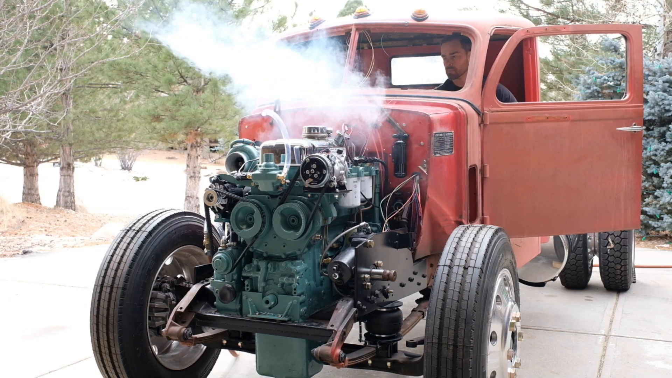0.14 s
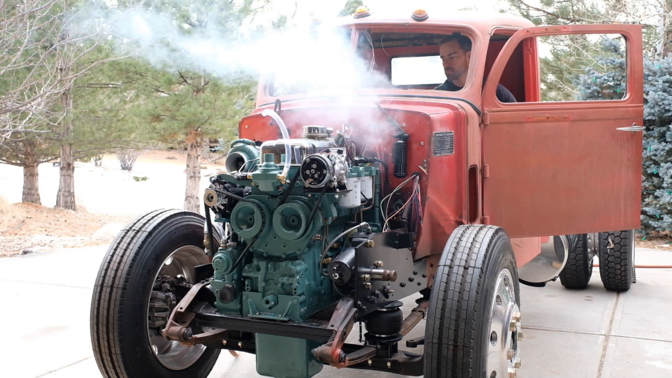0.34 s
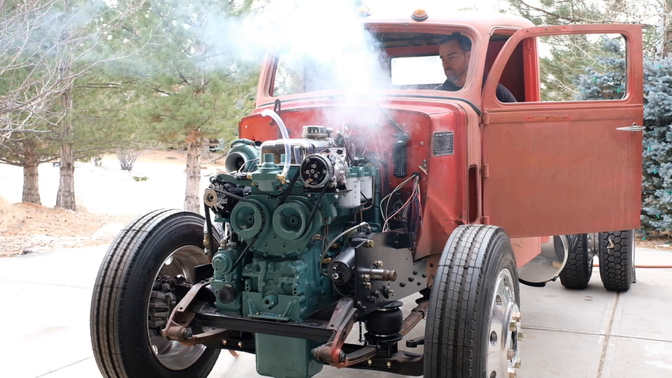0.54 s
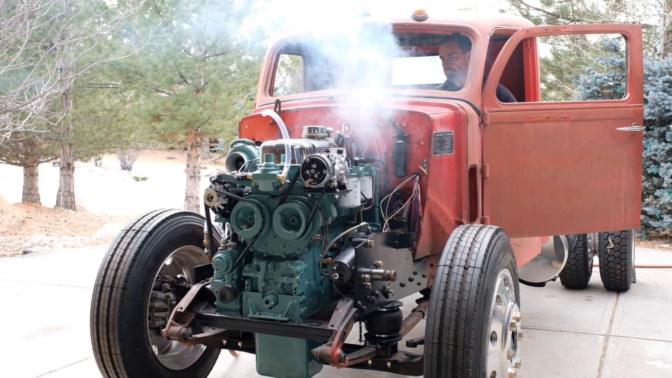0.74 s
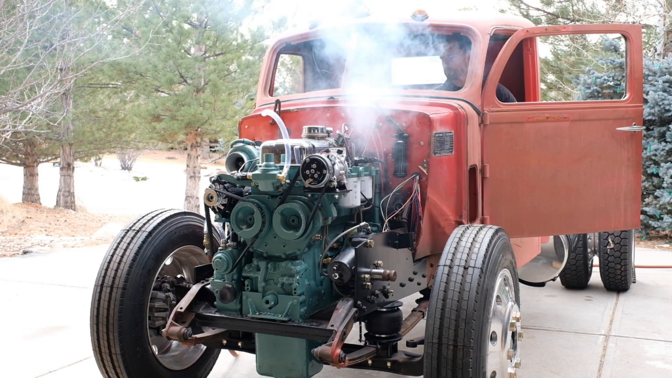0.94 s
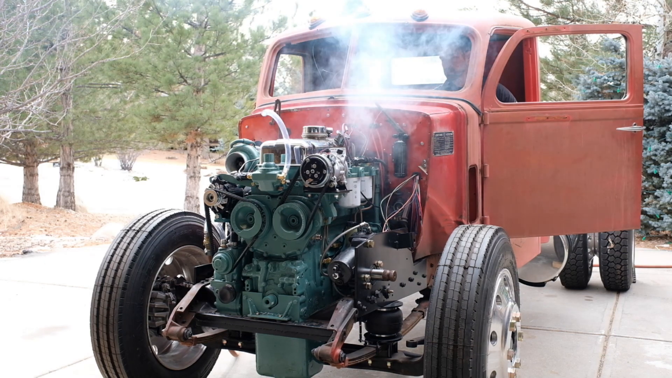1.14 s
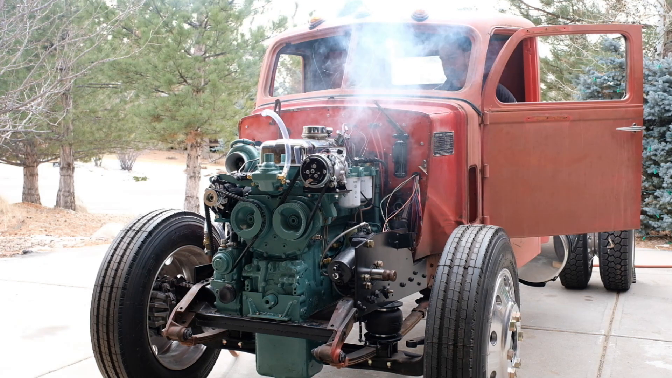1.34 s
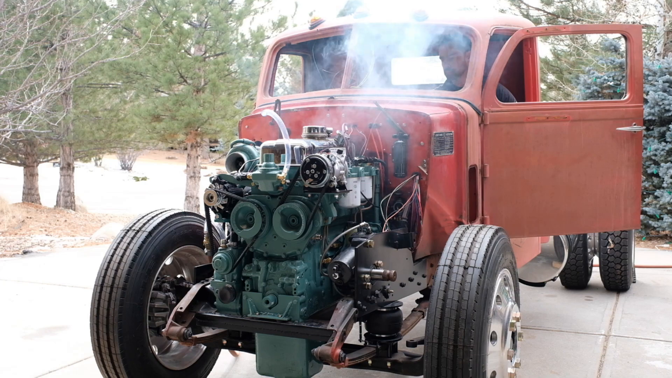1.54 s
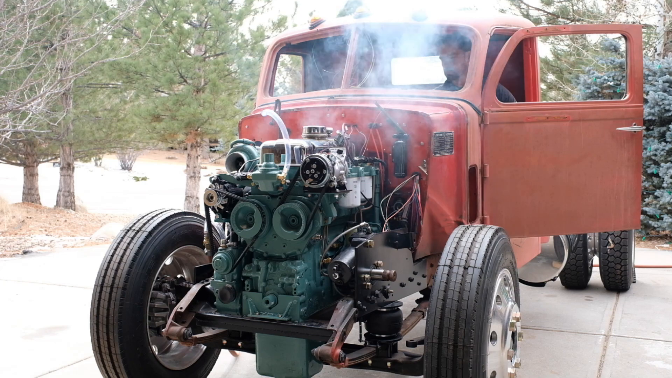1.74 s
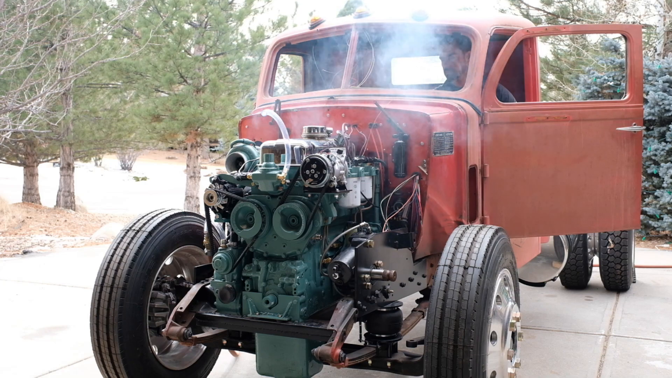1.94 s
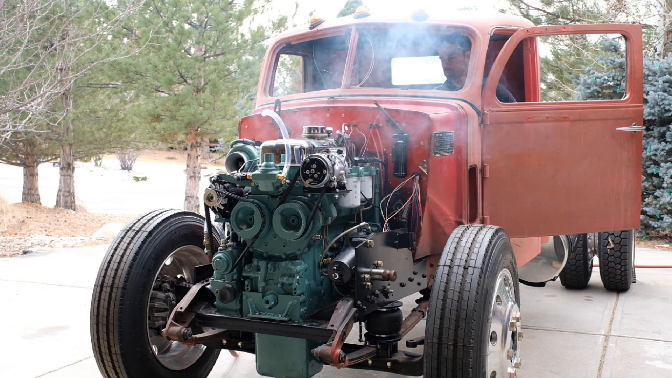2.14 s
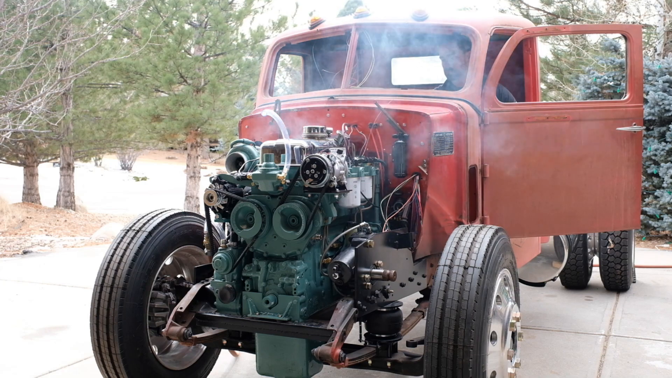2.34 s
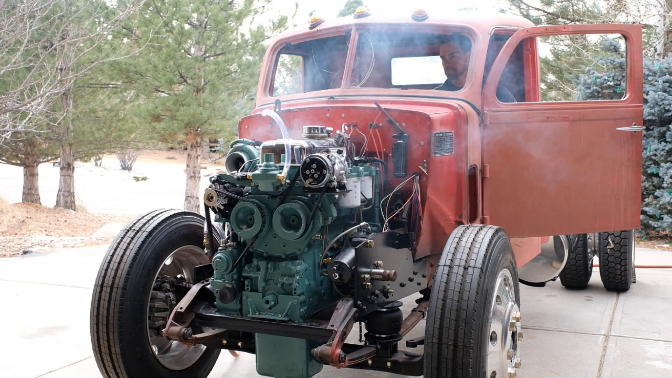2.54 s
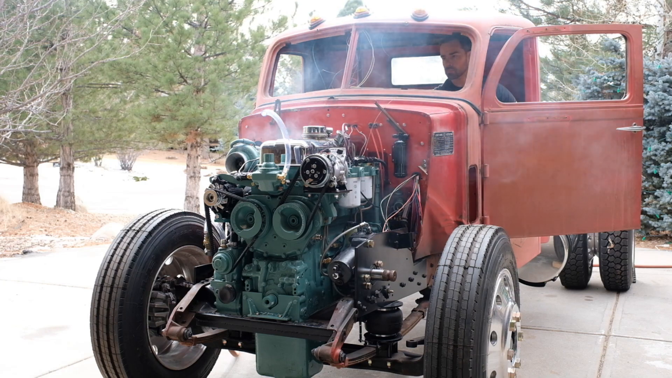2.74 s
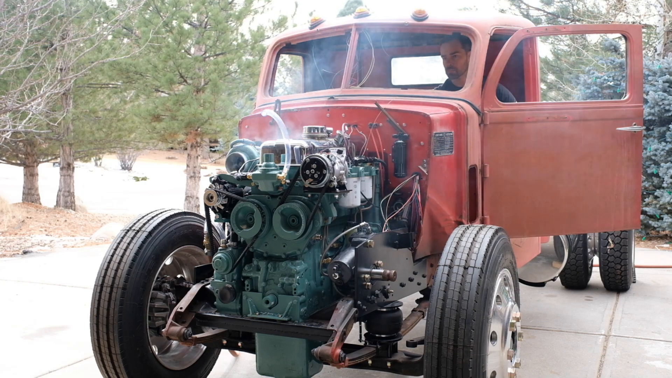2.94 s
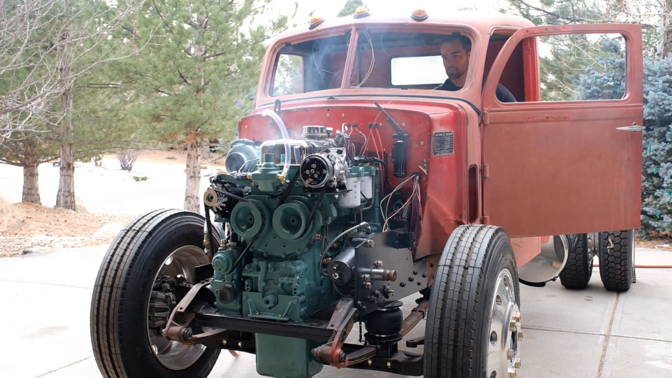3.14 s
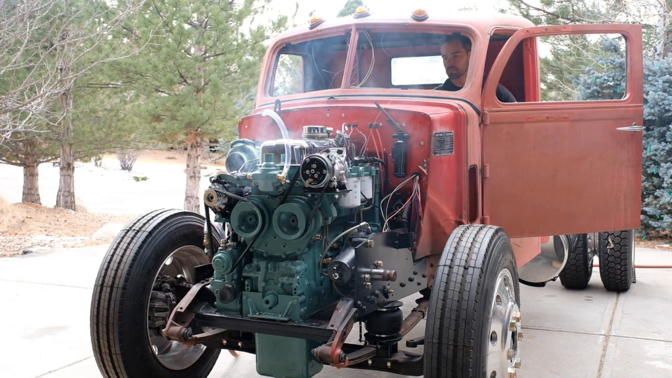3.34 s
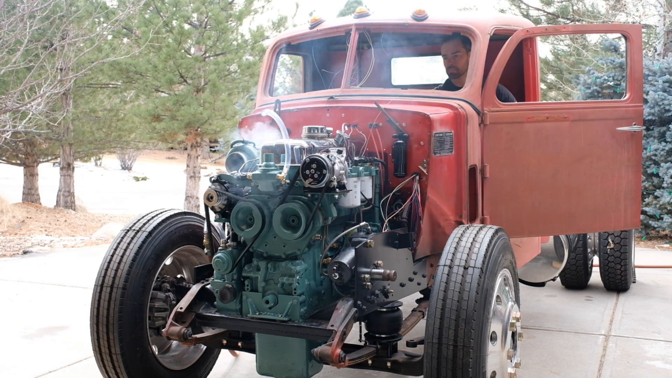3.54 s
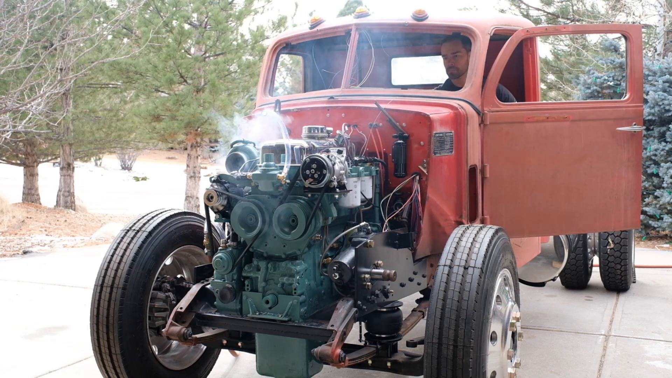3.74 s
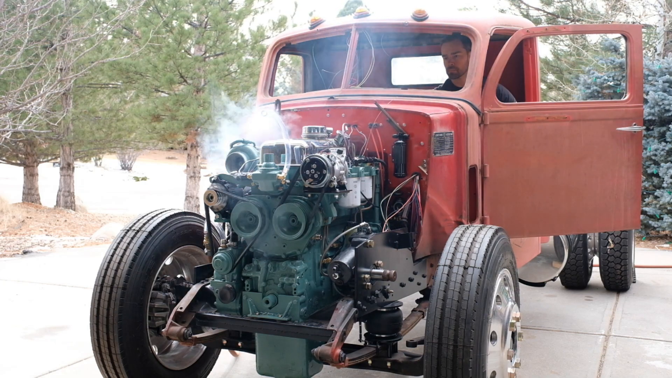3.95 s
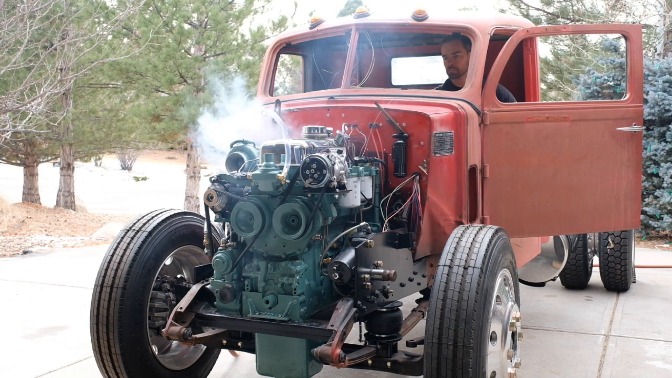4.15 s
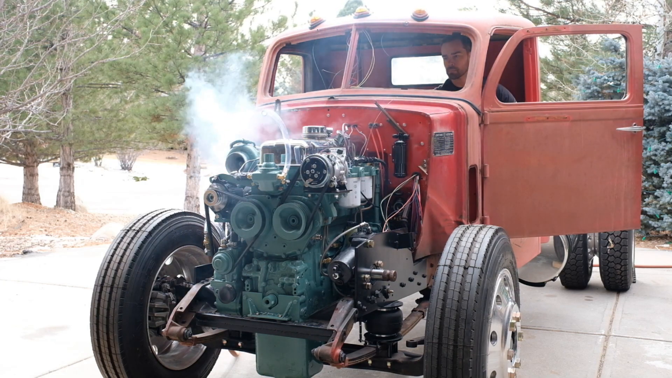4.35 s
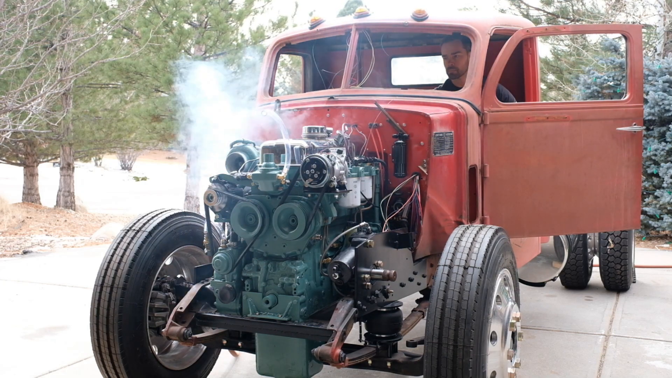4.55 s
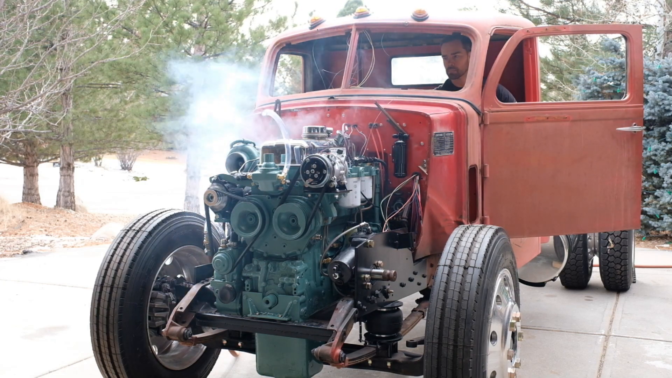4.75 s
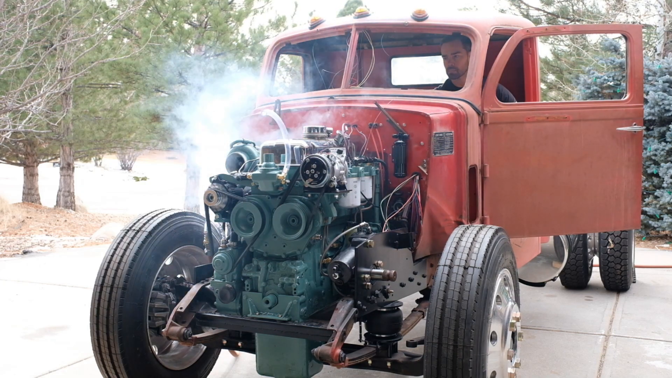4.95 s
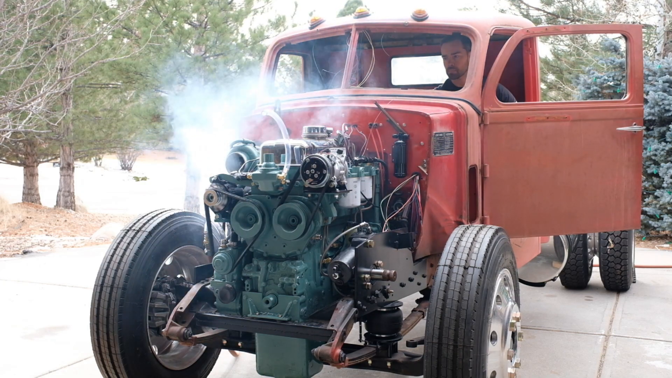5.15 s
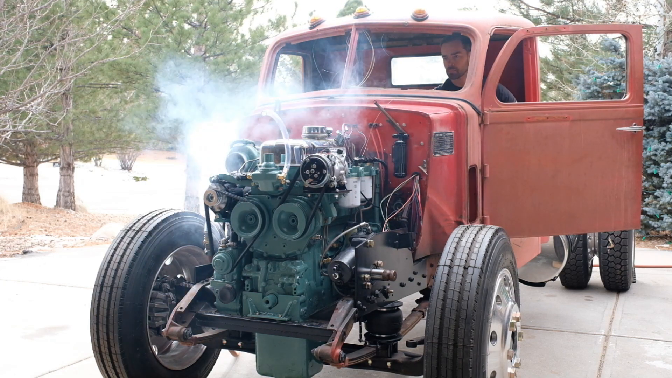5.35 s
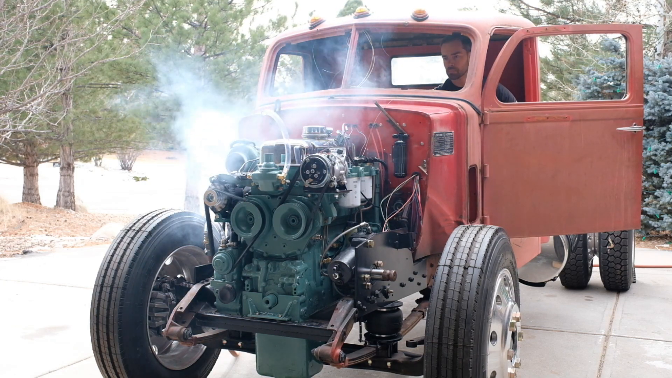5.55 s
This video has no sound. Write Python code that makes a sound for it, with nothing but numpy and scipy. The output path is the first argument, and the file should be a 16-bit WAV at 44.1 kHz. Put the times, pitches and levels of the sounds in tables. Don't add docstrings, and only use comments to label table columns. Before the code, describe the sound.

In an open yard, a big engine runs down to silence while uneven low wind gusts bump the left and right microphone ports. After a quiet pause comes a bright metallic slam, then a gritty geared whine climbing to cranking speed, pulsing with each compression. Knocks ring the iron casing, short high squeaks chirp, and a few exhaust thumps briefly raise the pitch. Steady laboured cranking carries on, close and loud, with short slap echoes.

```python
import sys
import numpy as np
from scipy import signal
from scipy.io import wavfile

SR = 44100
rng = np.random.default_rng(int(sys.argv[2]) if len(sys.argv) > 2 else 0)


def attenuation_scalar(level_db):
    decades = np.asarray(level_db, float) / 20
    return 10 ** decades


def log_audio(samples):
    frames = np.atleast_2d(samples).T
    limited = np.clip(frames, -1, 1)
    pcm = np.round(limited * 32767).astype(np.int16)
    wavfile.write(sys.argv[1], SR, pcm)


N = 246519
TIME = np.arange(N) / SR

# time_s, tooth_rate_hz, load_db
PINION = [
    (3.083, 175, -44),
    (3.17, 228.3, -28.5),
    (3.26, 296.5, -28),
    (3.35, 307.3, -24.5),
    (3.39, 347.3, -27.5),
    (3.56, 386.1, -23.5),
    (3.78, 408.3, -29.5),
    (4.6, 410.4, -30.5),
    (5.59, 408.7, -25.5),
]
CRANK_START_S = PINION[0][0]
# start_s, level_db, exhaust_pitch_hz, t60_s, kick_teeth_per_s
FIRINGS = [
    (3.857, -4.5, 132, 0.12, 104),
    (4.116, -7.5, 135, 0.12, 68),
    (4.347, -12.5, 152, 0.11, 0),
    (4.634, -11, 125.3, 0.21, 69.5),
]
# time_s, blow_db, ring_db
ENGAGING = [
    (3.087, -4.5, -5),
    (3.110, -0.5, -9),
    (3.177, -10, 8),
]
# time_s, blow_db, ring_db
COMPRESSIONS = [(3.248, -7, -7.5), (3.307, -15.5, -7.5), (3.376, -19.5, -13.5), (3.479, -13, -22.5),
                (3.577, -10.5, -2.5), (3.669, -9, -9), (3.751, -6.5, -23), (3.909, -1, -6),
                (3.967, -3, 1.5), (4.034, -17, 4), (4.161, -9, -6), (4.222, -10, 0), (4.282, -6.5, -4),
                (4.346, -8.5, -0.5), (4.413, -20, 5), (4.479, -25.5, 1), (4.544, -31, -3),
                (4.694, -3, -15.5), (4.753, -7.5, 0.5), (4.817, -10.5, -3), (4.884, -11.5, -2.5),
                (4.949, -13.5, 8.5), (5.012, -14.5, -1.5), (5.094, -9.5, 2), (5.166, -16, 2.5),
                (5.247, -9, 4), (5.321, -10.5, 3.5), (5.399, -17, 1.5), (5.479, -8, 6), (5.555, -9, -5)]
KNOCKS = np.vstack([ENGAGING, COMPRESSIONS])
# pitch_hz, width_hz
BELL_HZ = [(1390, 23.6), (2515, 17.2), (3000, 44)]


def rms_one(x):
    return x / np.sqrt(np.mean(x ** 2) + 1e-20)


def in_time(rows):
    s, *columns = np.transpose(rows)
    return [np.interp(TIME, s, c) for c in columns]


def at_hz(points, hz):
    points = np.array(points)
    return np.interp(np.log(hz), np.log(points[:, 0]), points[:, 1])


def band(x, low_hz, high_hz, order):
    return signal.sosfilt(signal.butter(order, [low_hz, high_hz], "band", fs=SR, output="sos"), x)


def low_pass(x, hz, order):
    return signal.sosfilt(signal.butter(order, hz, fs=SR, output="sos"), x)


def drift(rate_hz):
    r = np.exp(-40 * np.pi * rate_hz / SR)
    slow = signal.lfilter([1], [1, -2 * r, r * r], rng.standard_normal(N // 20 + 4002))[4000:]
    return np.interp(np.arange(N) / 20, np.arange(len(slow)), rms_one(slow))


def resonate(x, hz, width_hz):
    r = np.exp(-np.pi * width_hz / SR)
    poles = [1, -2 * r * np.cos(2 * np.pi * hz / SR), r * r]
    return signal.lfilter([(1 - r * r) / 2, 0, (r * r - 1) / 2], poles, x)


def coloured(spectrum, likeness, patchy_db, rate_hz):
    out, white = 0, rng.standard_normal((2, 2, N))
    lowest_hz, highest_hz = spectrum[0][0], spectrum[-1][0]
    edges_hz = np.geomspace(lowest_hz, highest_hz, int(2 * np.log2(highest_hz / lowest_hz)) + 2)
    for k, (low_hz, high_hz) in enumerate(zip(edges_hz, edges_hz[1:])):
        mid, side = band(white[k % 2], low_hz, high_hz, 2)
        hz = np.sqrt(low_hz * high_hz)
        alike = np.clip(at_hz(likeness, hz), 0, 1)
        gain = attenuation_scalar(at_hz(spectrum, hz) + patchy_db * drift(rate_hz))
        out = out + gain * (np.sqrt(1 + alike) * mid + np.sqrt(1 - alike) * side * [[1], [-1]])
    return rms_one(out)


def since_knock():
    at_s = KNOCKS[:, 0]
    share = np.interp(TIME, at_s, np.arange(len(at_s))) % 1
    last_s = at_s[np.clip(np.searchsorted(at_s, TIME) - 1, 0, None)]
    return np.abs(TIME - last_s), share


def run_ahead():
    rise_s, fade_s = .051, .46
    unload_db_per_hz, unload_s = .32, .034
    gained_hz, lost_db = np.zeros(N), np.zeros(N)
    for s, *_, kick_hz in FIRINGS:
        age_s = np.maximum(TIME - s, 0)
        gained_hz += kick_hz * np.minimum(age_s / rise_s, 1) * np.exp(-age_s / fade_s)
        lost_db += unload_db_per_hz * kick_hz * np.exp(-((TIME - s - rise_s / 4) / unload_s) ** 4)
    return gained_hz, lost_db


def housing(x, through_db):
    # pitch_hz, width_hz, level_db
    modes = [(610, 120, 3), (770, 90, -2), (990, 130, 3), (1250, 80, 0), (1390, 90, -1), (1820, 70, 0),
             (2100, 120, 0), (2340, 90, -2), (2515, 80, 1), (3000, 110, -5)]
    out = attenuation_scalar(through_db) * x
    for k, (hz, width_hz, db) in enumerate(modes):
        out = out - (-1) ** k * attenuation_scalar(db) * resonate(x, hz, width_hz)
    return out


def whine(sag, throb_db, wobble_db, rough_db):
    # order, level_db
    orders_db = [(1, -12), (2, -2.5), (3, -4.5), (4, -22), (5, -22), (6, -4), (9, -29)]
    pinion_teeth, bite_db_per_hz = 10, 0.0354
    hz, load_db = in_time(PINION)
    gained_hz, lost_db = run_ahead()
    hz = hz + gained_hz
    load_db = load_db - lost_db + bite_db_per_hz * gained_hz
    sixth_db = -2.5 - 0.2 * gained_hz
    share = since_knock()[1]
    turns = np.cumsum(hz * (1 + sag * (.5 - share) + .014 * drift(50))) / SR
    runout_db = wobble_db * np.sin(2 * np.pi * turns / pinion_teeth)
    beat_db = throb_db * (.5 - share) + runout_db
    tones = 0
    for k, db in orders_db:
        order_db = db + (k == 6) * sixth_db + k / 3 * beat_db
        tones = tones + attenuation_scalar(order_db + rough_db * drift(49)) * np.sin(2 * np.pi * k * turns)
    return attenuation_scalar(load_db + 6.0) * housing(tones, through_db=-10) * (TIME > CRANK_START_S)


def bell_db():
    # order, in_tune_db, max_loss_db
    tuning = [(3, -18.5, 9.5), (6, -17, 19.5), (6, -23.5, 32)]
    width = 0.13
    hz = in_time(PINION)[0] + run_ahead()[0]
    levels_db = []
    for (k, db, loss_db), (note_hz, _) in zip(tuning, BELL_HZ):
        mistuning = np.log(k * hz / note_hz) / width
        levels_db.append(db - loss_db * np.minimum(mistuning ** 2, 1))
    return levels_db


def knocks(burst_s):
    grit = rng.standard_normal((3, N))
    index = np.clip(np.searchsorted(KNOCKS[:, 0], TIME) - 1, 0, None)
    age_s, tuned_db = since_knock()[0], bell_db()
    shape = (1 - np.exp(-age_s / .0008)) * np.exp(-age_s / burst_s) * (TIME > KNOCKS[0, 0])
    blow = attenuation_scalar(KNOCKS[index, 1]) * shape * np.exp(-age_s / burst_s)
    dull = band(grit[0] * blow, 500, 2000, 3)
    bell = 0
    for k, (hz, width_hz) in enumerate(BELL_HZ):
        strike = attenuation_scalar(KNOCKS[index, 2] + tuned_db[k]) * shape * grit[k]
        bell = bell + resonate(strike, hz, width_hz)
    crack_db = np.where(index == 0, -5, -22.5)
    bright = (grit[1] + 0.64 * grit[2] * [[1], [-1]]) * blow * attenuation_scalar(crack_db)
    return attenuation_scalar(4) * dull + attenuation_scalar(26) * bell, band(bright, 2500, 9000, 2)


def squeaks(low_hz, rise_hz, length_s):
    # peak_time_s, level_db
    lone = [(3.49, -32), (3.6, -27), (3.832, -24.5), (4.05, -30), (4.3, -32), (4.56, -35), (4.6, -31),
            (5.04, -27)]
    # from_s, to_s, lead_s, level_db
    squeak_runs = [
        (4.4, 4.56, .036, -33.5),
        (4.87, 5.03, 0.03, -30.5),
        (5.08, 5.59, .013, -26.5),
    ]
    out = np.zeros(N)
    t = np.arange(-.06, .06, 1 / SR)
    note = np.exp(-(t / length_s) ** 2) * np.sin(2 * np.pi * (low_hz * t + rise_hz * t ** 2 / (4 * length_s)))
    events = list(lone)
    for from_s, to_s, lead_s, db in squeak_runs:
        events += [(s - lead_s, db) for s in KNOCKS[:, 0] if from_s < s < to_s]
    for s, db in events:
        at = round(s * SR) - len(t) // 2
        out[at:at + len(t)] += (attenuation_scalar(db + 1) * note)[:N - at]
    return out * attenuation_scalar(1.5 * np.array([drift(60), drift(60)]))


def firings():
    out, t = np.zeros((2, N)), TIME[:SR // 3]
    for s, db, hz, t60_s, _ in FIRINGS:
        puff = rng.standard_normal((2, len(t)))
        dull = band(puff + 0.16 * puff[::-1], 50, 300, 2)
        hiss = band(puff, 5000, 15000, 2) * np.exp(-t / 0.019)
        pulse = np.sin(2 * np.pi * hz * (t - 5.9 * t * t)) * np.exp(-t / 0.015)
        swell = (1 - np.exp(-t / .007)) * attenuation_scalar(db - 60 * t / t60_s)
        out[:, round(s * SR):][:, :len(t)] += swell * (pulse + attenuation_scalar(12.5) * dull + attenuation_scalar(-10) * hiss)
    return out


def gear_levels():
    # time_s, clatter_db
    rundown = [
        (0.0, -31.5),
        (0.2, -37),
        (0.33, -37.5),
        (0.484, -45.5),
        (0.6, -57),
        (0.75, -66),
        (0.87, -85.5),
    ]
    coast_db, = in_time(rundown)
    age_s = np.maximum(TIME - CRANK_START_S, 0)
    labour, on = np.exp(-age_s / 0.16), age_s > 0
    onset_db = 20 * np.log10(1.001 - np.exp(-age_s / 0.015))
    lurch_db = 12 * np.exp(-((TIME - 3.23) / 0.097) ** 2)
    lurch_db = lurch_db + 0.0917 * run_ahead()[0]
    coast_hiss_db = 0.5 + 2.4 * np.minimum(coast_db + 36, 0)
    clatter_db = np.where(on, -21 + 7 * labour + onset_db, coast_db)
    rumble_db = np.where(on, -37.5 + lurch_db + onset_db, coast_db - 12.5)
    return clatter_db, rumble_db, np.where(on, -16.5 * labour, coast_hiss_db)


def running_gear():
    # pitch_hz, density_db
    clatter_colour, rumble_colour = [(180, -47), (250, -13), (500, -3.5), (800, -1.5), (1200, -1),
                                     (1700, -5.5), (2500, -6), (3200, -20.5), (4000, -16.5), (6300, -26),
                                     (9500, -31.5), (11000, -45), (12500, -39), (16000, -40)], [(22, -0.5), (45, -10.5), (90, 2.5), (150, -5.5),
                                                      (260, -1), (420, -11)]
    # pitch_hz, likeness
    clatter_likeness, rumble_likeness = [(60, 0.88), (300, 1), (900, 0.95), (2000, 0.68), (4000, 0.21),
                                         (9000, 0.35)], [(30, 0.18), (120, 1), (300, 0.92)]
    # pitch_hz, width_hz, over_clatter_db
    covers = [(1300, 250, -3), (1820, 40, 1), (3450, 70, 2), (4050, 80, 3), (4360, 80, 4), (4850, 40, 8),
              (5040, 40, 5), (5340, 90, 2), (7900, 700, -1), (9400, 900, 3)]
    clatter_db, rumble_db, hiss_db = gear_levels()
    noise = coloured(clatter_colour, clatter_likeness, patchy_db=1.0, rate_hz=24)
    ringing = sum(attenuation_scalar(db + 4 * drift(15)) * resonate(noise, hz, width_hz) for hz, width_hz, db in covers)
    clatter = rms_one(noise + ringing)
    body = low_pass(clatter, 3500, 1)
    clatter = body + attenuation_scalar(hiss_db + 0.47 * drift(50.0)) * (clatter - body)
    throb = attenuation_scalar(5 * (.5 - since_knock()[1]) * (TIME > KNOCKS[0][0]))
    rumble = coloured(rumble_colour, rumble_likeness, patchy_db=3.0, rate_hz=15.0)
    return attenuation_scalar(clatter_db) * throb * clatter + attenuation_scalar(rumble_db) * rumble


def wind():
    # time_s, level_db, left_minus_right_db
    gusts = [(0.0, -51, -3), (0.32, -55, -22), (0.75, -49, 3), (1.0, -45.5, 2), (1.2, -47, 3),
             (1.54, -39, -2), (1.7, -43, 6), (1.87, -50.5, -10), (2.1, -46, -2), (2.24, -61, 6),
             (2.67, -72, -7), (3.08, -62, -11.5)]
    # time_s, peak_db, pitch_hz, port (0 left, 1 right)
    strong = [(0.187, -24, 138, 1), (0.22, -26, 102, 1), (0.272, -24, 195, 1), (0.302, -18, 92, 1),
              (0.344, -26, 105, 1), (0.382, -29, 99, 1), (0.611, -27, 82, 1), (0.724, -29, 110, 0),
              (0.85, -21, 111, 1), (1.01, -18, 135, 0), (1.122, -25, 119, 0), (1.158, -24, 124, 0),
              (1.232, -30, 85, 0), (1.426, -25, 155, 1), (1.428, -19, 116, 0), (1.464, -27, 174, 0),
              (1.518, -17, 154, 1), (1.574, -29, 81, 1), (1.608, -27, 81, 0), (1.626, -28, 78, 1),
              (1.671, -24, 110, 1), (1.674, -18, 168, 0), (1.891, -28, 112, 1), (2.035, -25, 86, 1),
              (2.088, -28, 115, 1)]
    # pitch_hz, density_db
    gust_colour = [(22, -27.5), (45, 11.5), (80, 1.5), (130, -5.5), (200, -9), (330, -24.5)]
    gust_db, pan_db = in_time(list(gusts) + [(3.2, -60, 0.039)])
    lumps = attenuation_scalar(2.5 * np.array([drift(14), drift(14)]))
    likeness = [(50, 0.084), (300, 0.15)]   # pitch_hz, likeness
    turbulence = rms_one(lumps * coloured(gust_colour, likeness, patchy_db=4.5, rate_hz=8.8))
    out = attenuation_scalar(gust_db + 4.5 + np.array([[.5], [-.5]]) * pan_db) * turbulence
    t = np.arange(-.04, .04, 1 / SR)
    when, size, pitch, side = rng.random((18, 4)).T
    when_s = np.interp(when, (0, 1), (.1, 2.0))
    small = zip(when_s, -34 + 3 * (size - .5), 70 * 2 ** pitch, side > .4)
    for s, db, hz, port in list(strong) + list(small):
        swell = 1.2 * np.exp(-np.abs(t * hz / .55) ** 1.3)
        swing = swell * np.sin(2 * np.pi * hz * t + rng.uniform(0, 2 * np.pi))
        out[int(port), round(s * SR) - len(t) // 2:][:len(t)] += attenuation_scalar(db) * swing
    return out


def distant_air():
    # pitch_hz, density_db
    air_colour = [(22, 0.5), (60, -7.5), (250, -6.5), (600, -7.5), (1000, -15.5), (1600, -23.5),
                  (2500, -29), (4000, -34.5), (8000, -40.5), (11000, -40), (13000, -40.5), (16000, -51.5)]
    # pitch_hz, likeness
    air_likeness = [(60, 0.27), (130, 0.42), (280, 0.7), (600, 0.68), (1300, 0.13), (2810, 0.05)]
    return attenuation_scalar(-53) * coloured(air_colour, air_likeness, patchy_db=0.7, rate_hz=2.8)


def yard(x):
    # delay_s, level_db, pan_db
    echoes = [(.0041, -26, 0.5), (0.0106, -11, -10.5), (.023, -11, 6), (.047, -7.5, -10)]
    out = x * attenuation_scalar([[-.5], [.5]])
    dull = low_pass(x, 5000, 1)
    for s, db, pan_db in echoes:
        lag = round(s * SR)
        out[:, lag:] += attenuation_scalar(db + np.array([[.5], [-.5]]) * pan_db) * dull[:N - lag]
    return out


def scene():
    gears = whine(sag=.09, throb_db=10, wobble_db=3.5, rough_db=3.5)
    thud, crack = knocks(burst_s=.013)
    squeak = squeaks(low_hz=3450, rise_hz=200, length_s=.011)
    engine = yard(gears + thud) + squeak + crack + firings() + running_gear()
    return engine + wind() + distant_air()


def top_cut(x):
    return signal.sosfilt(signal.butter(12, 15740, fs=SR, output="sos"), x)


def record(dry):
    heard = low_pass(dry, 8360, 2)
    heard = heard + attenuation_scalar(-81) * rng.standard_normal(dry.shape)
    mix = .95 * np.tanh(heard / .95)
    return top_cut(mix)


dry = scene()
out = record(dry)
log_audio(out)
```